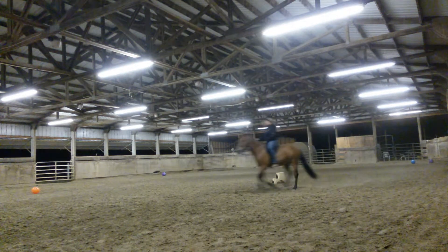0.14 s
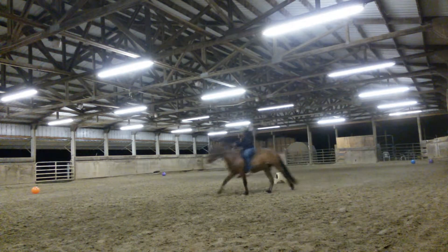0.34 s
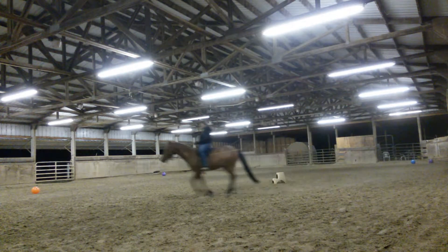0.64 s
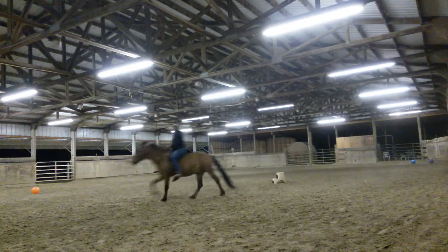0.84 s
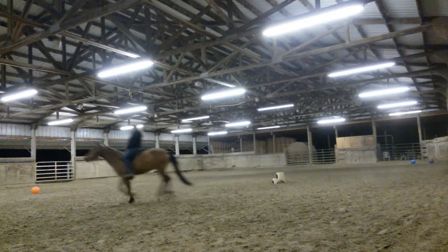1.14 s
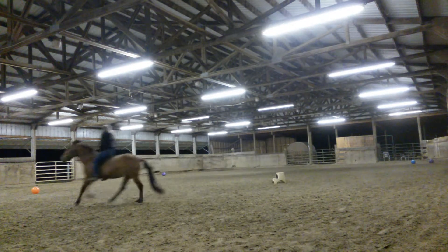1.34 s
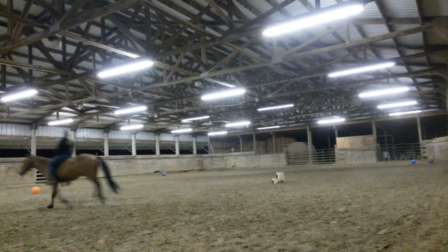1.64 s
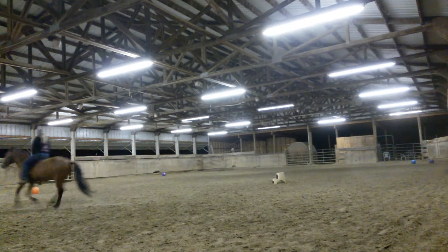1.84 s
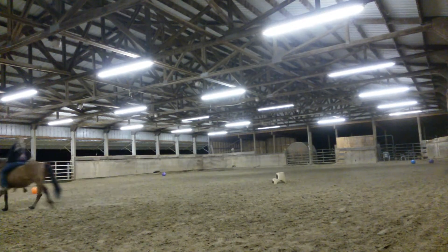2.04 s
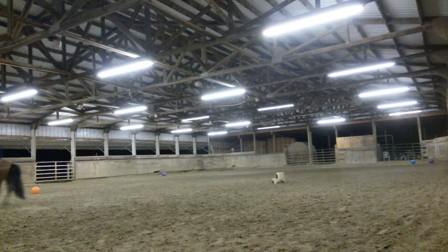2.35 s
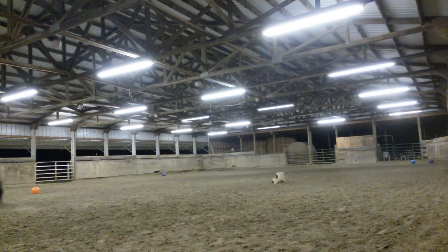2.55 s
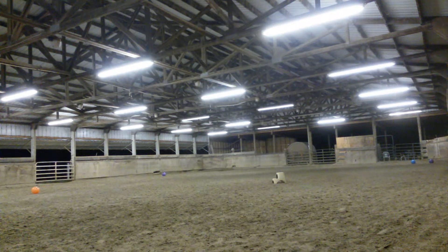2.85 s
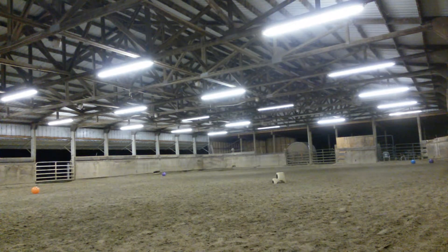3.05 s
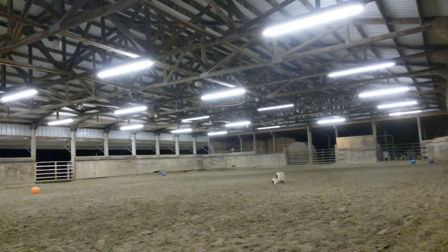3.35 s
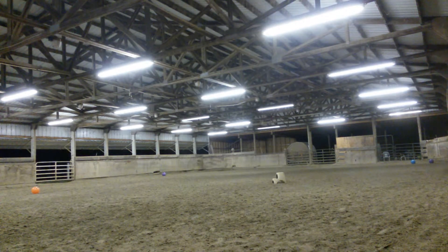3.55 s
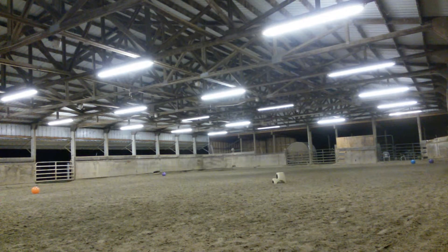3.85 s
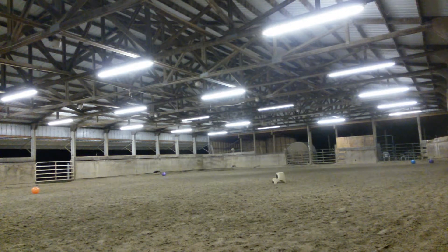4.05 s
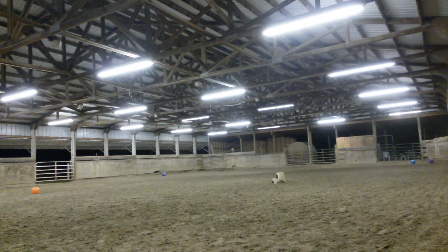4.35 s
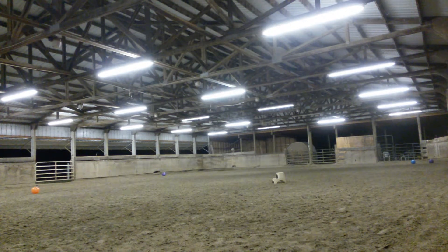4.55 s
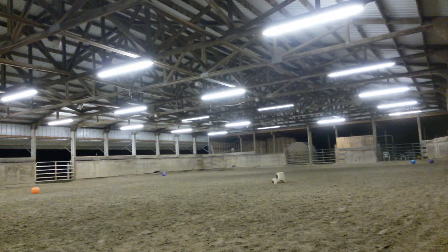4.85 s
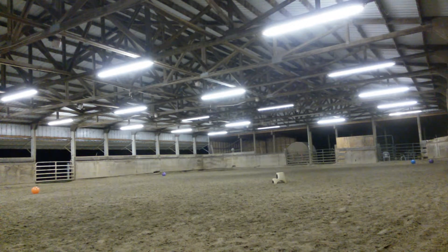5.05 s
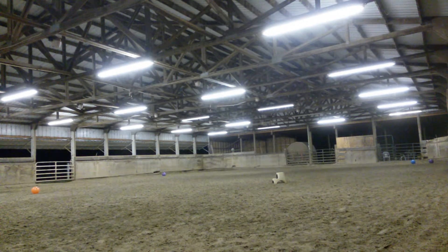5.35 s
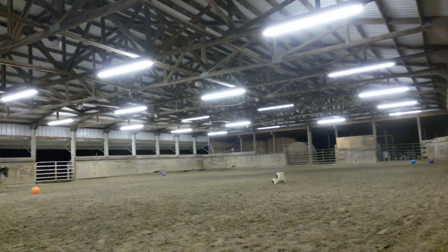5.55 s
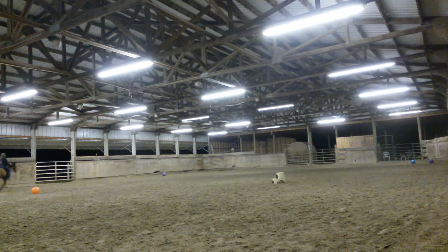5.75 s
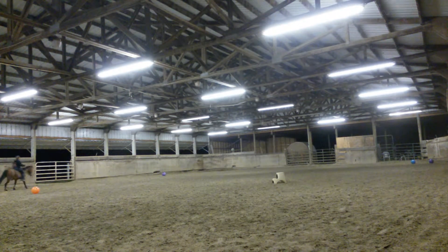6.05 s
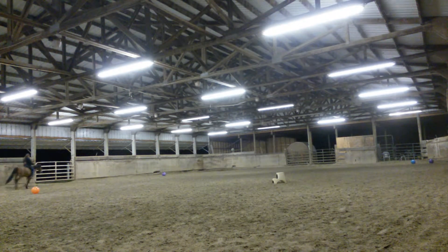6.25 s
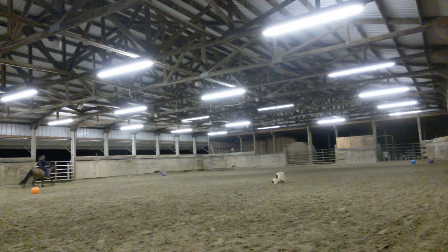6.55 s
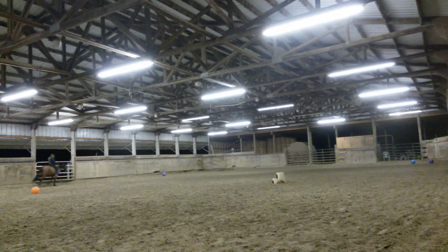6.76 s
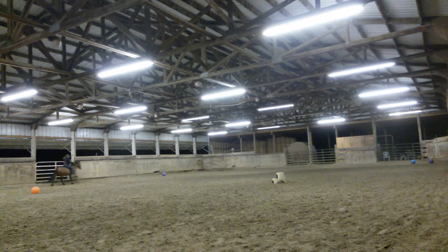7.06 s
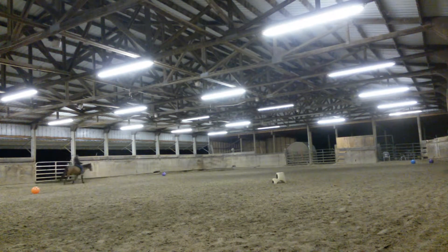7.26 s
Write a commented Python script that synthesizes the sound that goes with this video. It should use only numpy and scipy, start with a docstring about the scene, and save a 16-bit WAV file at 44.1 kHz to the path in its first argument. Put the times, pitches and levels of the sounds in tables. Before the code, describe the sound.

A ridden horse canters on soft dirt in an indoor arena. Dull low thuds come in stride groups, with gritty crunches and sprays of sand, while small metal tack jingles thin and high. It passes nearest around one second, moves left and grows fainter as it circles away. The stereo microphone stays still; a diffuse hall echo and quiet low rumble surround everything.

```python
"""An indoor arena with soft dirt: a horse canters past in front of the microphone and circles away to the left.
Each hoof is a short swinging thud with noise of breaking clods; shaped noise bursts are the thrown sand.
Small metal on the tack jingles with every stride: random touches set off a high, whine-like ring that never
quite stops. A thin swish marks some strides. Decaying noise is the echo, over the quiet rumble of the hall."""
import sys
import numpy as np
from scipy import signal
from scipy.fft import rfft, irfft
from scipy.io import wavfile
from scipy.ndimage import uniform_filter1d, map_coordinates

SR = 44100
rng = np.random.default_rng(int(sys.argv[2]) if len(sys.argv) > 2 else 0)


def persist_wave(psi):
    """Save psi, clipped to +-1, as 16-bit WAV."""
    counts = np.round(np.clip(psi, -1, 1) * 32767).astype(np.int16)
    wavfile.write(sys.argv[1], SR, np.atleast_2d(counts).T)


N = 326011
TIME = np.arange(N) / SR  # [s]

# hoofbeats: (time [s], relative thud level [dB], pitch of the blow [Hz], contact length [s],
# relative thrown sand level [dB])
HOOF_BEATS = [(.0, -36.5, 216, 0.037, -56), (.025, -40.5, 98.8, 0.11, -66.5),
              (.135, -49.5, 172.6, 0.083, -82), (0.373, -38, 101, 0.024, -54.5),
              (0.498, -34, 120.8, 0.018, -56), (0.918, -32.5, 97.4, 0.051, -54),
              (1.029, -46, 126.5, 0.068, -52), (1.498, -35.5, 189, 0.038, -48.5),
              (1.635, -44, 190, 0.036, -67.5), (2.065, -38, 107, 0.027, -52),
              (2.206, -35.5, 195, 0.023, -62.5), (2.523, -37, 200, 0.017, -57),
              (2.628, -41.5, 192.6, 0.029, -56.5), (3.215, -44.5, 187.5, 0.053, -54.5),
              (3.344, -46, 140, .058, -58), (3.786, -53.5, 235, 0.071, -58),
              (4.375, -44.5, 216.6, 0.035, -58.5), (4.51, -49, 100, 0.053, -59),
              (4.927, -42, 101.8, 0.043, -61.5), (5.076, -38, 97.1, 0.062, -65),
              (5.213, -49.5, 98, 0.029, -77), (5.368, -44, 167, 0.035, -65),
              (5.515, -48.5, 121, 0.037, -64), (5.649, -40.5, 100, 0.053, -61.5),
              (5.945, -41.5, 120, .024, -72), (6.077, -42, 174.7, 0.059, -60.5),
              (6.231, -44, 187.5, 0.044, -64), (6.536, -46, 94, 0.017, -78), (6.641, -36, 206, 0.05, -62),
              (6.783, -42, 123.5, 0.035, -63), (7.073, -46, 237, 0.057, -70),
              (7.22, -47, 142.6, 0.045, -62.5)]
# the tack is tossed once a stride: (time [s], length [s], relative jingle level [dB])
TACK_TOSSES = [(-.03, 0.07, -38), (0.357, .33, -45), (0.945, .41, -44), (1.53, 0.32, -47),
               (2.097, 0.26, -49.5), (2.695, 0.25, -51.5), (3.297, 0.17, -50.5), (3.82, 0.26, -55.5),
               (4.383, 0.48, -53), (4.992, 0.34, -51), (5.496, 0.25, -50.5), (6.089, 0.19, -50),
               (6.7, 0.23, -57.5), (7.108, 0.39, -65.5)]


def hoofs(tone_db=-1.0, overtone_db=-6, ground_db=-6, ground_hz=92, thump_db=-10, crumble_s=0.0084):
    """Each hoof sinks in: the soil swings for a few cycles while clods collapse under it."""
    # spectrum of the collapsing clods: (frequency [Hz], relative level [dB])
    thump_spectrum = [(30, -23), (70, -21), (190, 5), (370, 0), (480, -12.5), (650, -6.5), (1000, -24),
                      (2500, -27.5)]
    swing, press = np.zeros(N), np.zeros(N)
    slip = 0.5 * wander(150)  # phase wander [rad]
    for start, db, hz, length, _ in HOOF_BEATS:
        t = TIME[:int(length * SR)]
        load = undb(db) * np.sin(np.pi * t / length)
        # soil gives way unevenly
        uneven = np.take(slip, int(start * SR) + np.arange(len(t)), mode="wrap")
        phase = 2 * np.pi * hz * t + uneven
        depth = min(ground_hz / hz, 1) ** 2  # near 1 for a deep blow, small for a sharp one
        overtone = undb(overtone_db) * depth * np.sin(2 * phase)
        # a sharp blow still shakes the base layer
        ground = undb(ground_db) * (1 - depth) * np.sin(2 * np.pi * ground_hz * t)
        add(swing, start, load * (np.sin(phase) + overtone + ground))
        add(press, start, load)
    # clods go on breaking after the blow
    keep = np.exp(-1 / (crumble_s * SR))
    lingering = signal.lfilter([1 - keep], [1, -keep], press)
    crumble = (press + lingering) / 2
    clods = crumble * colour(rng.standard_normal(N), thump_spectrum)
    return undb(tone_db) * swing + undb(thump_db) * clods


def sand(crunch_db=1, spray_db=0, trickle_db=-7, grit_db=0, grit_s=0.0027, rise_s=0.001, clump_db=2,
         throw_s=0.056, throw_spray_db=3, fall_db=-9, fall_s=0.23,
         near_m=4.65, loose_db=-57, loose_db_per_m=2.38, spray_db_per_m=1.5):
    """Dirt crunches under the hoof, fine grains fly and fall back; loose soil trickles on between steps."""
    # a hoof drags through the sand as it lifts:
    # (time [s], relative crunch level [dB], relative fine spray level [dB], length [s])
    hoof_drags = [(0.25, -52, -50.5, 0.034), (0.781, -50, -48, 0.043), (1.16, -55.5, -80, 0.11),
                  (1.37, -55, -50, 0.082), (1.937, -53.5, -52, 0.041), (2.416, -66, -40.5, 0.032),
                  (2.484, -59, -49.5, 0.038), (3.014, -59, -52, 0.08), (3.091, -52.5, -58, 0.03),
                  (3.645, -59.5, -61, 0.06), (3.925, -54, -58.5, 0.049), (4.222, -64.5, -63, 0.043),
                  (4.792, -62.5, -67, .06), (4.852, -73, -55, 0.032), (4.965, -60.5, -64, 0.11)]
    # single bits of grit snapping: (time [s], relative level [dB])
    grit_snaps = [(0.154, -40.5), (.456, -38), (0.623, -40), (.667, -40.5), (1.292, -39), (1.403, -36),
                  (2.185, -37), (3.575, -49)]
    # how far away the horse is: (time [s], distance [m])
    horse_distance = [(0, 8.1), (1.15, 4.4), (2.3, 6.25), (4.2, 10.7), (5.2, 8.8), (7.39, 13)]
    # spectra of coarse dirt and fine grains: (frequency [Hz], relative level [dB])
    crunch_spectrum = [(150, -4), (550, 4), (1200, 0.5), (2200, -2), (4000, -2.5), (5300, 5.5),
                       (7500, -8.5), (15000, -38)]
    spray_spectrum = [(1500, -24), (5000, 9), (8000, 1), (10000, 6.5), (13300, 15), (14500, -23)]

    crunch, spray, t = np.zeros(N), np.zeros(N), TIME[:SR // 2]
    beyond = curve(horse_distance) - near_m  # metres past the reference distance
    rise = 1 - np.exp(-t / rise_s)
    flying = np.exp(-(t / throw_s) ** 2)
    falling = undb(fall_db) * np.exp(-t / fall_s)
    throw = rise * np.hypot(flying, falling)
    for start, *_, db in HOOF_BEATS:
        add(crunch, start, undb(db) * throw)
    # of the thrown sand, the fine spray fades faster with distance
    spray += crunch * undb(throw_spray_db - spray_db_per_m * beyond)
    for start, low_db, high_db, length in hoof_drags:
        burst = rise * np.exp(-(t / length) ** 2)
        add(crunch, start, undb(low_db + crunch_db) * burst)
        add(spray, start, undb(high_db + spray_db) * burst)
    for start, db in grit_snaps:
        add(spray, start, undb(db + grit_db) * np.exp(-t / grit_s))

    loose = undb(loose_db - loose_db_per_m * beyond) * airborne(hush_db=-3)
    coarse_noise = scattered(lambda: colour(grains(spread_db=3), crunch_spectrum), wet_db=7.5)
    fine_noise = scattered(lambda: colour(grains(spread_db=2.5), spray_spectrum), wet_db=12.5)
    coarse = np.hypot(crunch, loose) * coarse_noise
    fine = np.hypot(spray, undb(trickle_db) * loose) * fine_noise
    return (coarse + fine) * undb(clump_db * wander(40))  # soil falls in lumps


def tack(jingle_db=-1.5, rise_s=0.00032, flutter_db=1.7, rebound_s=0.003, flight_s=0.015, flight_db=-7,
         clink_db=1, rattle_db=-10, rattle_s=0.029):
    """Small metal parts chatter against each other in flurries, ringing briefly at every touch."""
    # modes of the metal: (frequency [Hz], time to fall 60 dB [s], relative level [dB])
    metal_modes = [(6250, 0.023, -18), (6462, 0.016, 21), (6360, 0.035, -19), (5460, 0.0033, -30),
                   (9500, .03, -38)]
    # sharp clinks: (time [s], relative level [dB])
    hard_strikes = [(.029, -27), (.089, -25.5), (.215, -28), (.57, -39), (.68, -31.5), (.954, -32.5),
                    (1.127, -27), (1.341, -33), (1.718, -38), (2.158, -30.5), (2.2, -30), (2.286, -29.5),
                    (2.474, -35), (3.47, -36), (4.097, -35.5), (4.406, -39.5), (4.596, -35), (4.644, -37.5),
                    (5.067, -32), (5.572, -31.5), (5.735, -36.5), (5.89, -42.5)]
    t = TIME[:SR // 10]
    modes = sum(undb(db - 60 * t / t60) * np.sin(2 * np.pi * hz * t) for hz, t60, db in metal_modes)
    ring = (1 - np.exp(-t / rise_s)) * modes
    ring = ring / np.abs(ring).max()

    shake = flurries() * undb(jingle_db + flutter_db * wander(79))
    clinks, rattle = np.zeros(N), np.zeros(N)
    for (start, db), chance in zip(hard_strikes, rng.random(len(hard_strikes))):
        # the parts swing almost free before a hard strike
        shake[(TIME > start - flight_s) & (TIME < start)] *= undb(flight_db)
        strike = undb([db + clink_db])
        add(clinks, start, strike)
        # they bounce once after it and set their neighbours rattling
        add(clinks, start + rebound_s * (0.5 + chance), strike / 2)
        add(rattle, start, undb(db + rattle_db) * np.exp(-t / rattle_s))
    chatter = scattered(touches, wet_db=3.0) * np.hypot(shake, rattle)
    chatter = chatter / np.sqrt(np.sum(ring ** 2))  # makes up for the energy of the ring
    return signal.fftconvolve(chatter + place(clinks), ring[None], axes=1)[:, :N]


def flurries(toss_s=0.02, settle_s=0.094, idle_db=-59):
    """How hard the tack is shaken: each stride tosses it, keeps it going and lets it settle, never to silence."""
    tossed = np.zeros(N)
    for start, length, db in TACK_TOSSES:
        build = np.clip((TIME - start) / toss_s, 0, 1)
        settle = np.exp(-np.maximum(TIME - start - length, 0) / settle_s)
        tossed += undb(db) * build * settle
    return np.hypot(tossed, undb(idle_db) * airborne(hush_db=-4))


def touches(per_s=200):
    """Random metal contacts of unequal strength, at rms 1."""
    return unit((rng.random(N) < per_s / SR) * rng.uniform(0.73, 1, N))


def swishes(hz=4720, width_hz=340, length_s=0.075):
    """A narrow band of hiss, a thin whistling swish, swells and fades on some strides."""
    # (middle [s], level [dB])
    swish_swells = [(.49, -54), (1.8, -57.5), (2.458, -55), (3.22, -63), (3.82, -60.5), (4.54, -60),
                    (6.77, -61.5)]
    swell = sum(undb(db) * np.exp(-((TIME - at) / length_s) ** 2) for at, db in swish_swells)
    b, a = signal.iirpeak(hz, hz / width_hz, fs=SR)
    return swell * unit(signal.filtfilt(b, a, diffuse()))


def airborne(hush_db, lead_s=0.069, width_s=0.043):
    """Gain that dips just before each toss of the tack: all four hooves are off the ground, little stirs."""
    dips = sum(np.exp(-((TIME - start + lead_s) / width_s) ** 2) for start, *_ in TACK_TOSSES)
    return undb(hush_db * dips)


def place(x):
    """Bearing of the horse from the microphone: the sound reaches the nearer ear first."""
    # (time [s], lead of the left ear [ms])
    horse_bearing = [(0, -0.12), (.75, -0.022), (1.25, 0.1), (2.3, 0.2), (5.5, 0.2215), (7.39, 0.096)]
    lead = curve(horse_bearing) * SR / 1000  # [samples]
    return np.array([map_coordinates(x, [np.arange(N) + side * lead / 2], order=5) for side in (1, -1)])


def scattered(source, wet_db):
    """Tiny impacts arrive directly, and off ground and boards in a different jumble at each ear."""
    wet = undb(wet_db)
    direct = place(source())
    jumble = np.array([source(), source()])
    return (direct + wet * jumble) / np.hypot(1, wet)


def arena(x, t60_s, gap_s):
    """Roof and walls answer with a diffuse tail that swells in over a short gap and dies away."""
    t = TIME[:SR]
    decay = np.exp(-np.log(1000) * t / t60_s)
    onset = 1 - np.exp(-(t / gap_s) ** 2)
    tail = diffuse()[:, :SR] * decay * onset
    tail = tail / np.sqrt(np.sum(tail ** 2) / 2)
    return signal.fftconvolve(x[None], tail, axes=1)[:, :N]


def background(hall_db, rumble_db):
    """The steady air of the hall, and a low rumble that follows the strides and fades as the horse leaves."""
    # spectra of the air and the rumble: (frequency [Hz], relative level [dB])
    hall_spectrum = [(25, -18), (100, 5.5), (240, -17.5), (490, -13.5), (1700, -21), (4500, -21),
                     (6500, -25), (8000, -25), (13000, -24)]
    rumble_spectrum = [(25, -31), (50, 3.5), (100, -1), (230, -2.5), (450, -13.5), (900, -21.5),
                       (2000, -26)]
    # low rumble in the hall: (time [s], relative level [dB])
    rumble_course = [(0, -44.5), (.74, -48.5), (1.05, -48.5), (2.3, -53), (4.2, -55.5), (7.39, -54)]
    rumble_gain = undb(curve(rumble_course) + rumble_db) * airborne(hush_db=-4)
    air = undb(hall_db) * colour(diffuse(), hall_spectrum)
    return air + rumble_gain * colour(diffuse(), rumble_spectrum)


def diffuse(alike_hz=600):
    """Noise from all around: mostly alike at both ears in the bass, unrelated in the treble."""
    hz = np.fft.rfftfreq(N, 1 / SR)
    mid, side = rfft(rng.standard_normal((2, N)))
    apart = np.pi / 4 * np.minimum(0.23 + 0.73 * hz / alike_hz, 1)
    return irfft(mid * np.cos(apart) + np.array([[1], [-1]]) * side * np.sin(apart), N)


def grains(spread_db):
    """Dense tiny impacts of very unequal size, at rms 1."""
    size_db = spread_db * np.minimum(rng.exponential(size=N), 2 * np.pi)
    return unit(rng.standard_normal(N) * undb(size_db))


def wander(rate_hz):
    """A smooth random motion of rms 1: noise averaged twice over 1 / rate_hz."""
    size = int(SR / rate_hz)
    return unit(uniform_filter1d(uniform_filter1d(rng.standard_normal(N), size), size))


def colour(x, points):
    """Give a sound a spectrum, at rms 1."""
    return unit(irfft(rfft(x) * spectrum(points), N))


def spectrum(points):
    """Gain at every frequency from (frequency [Hz], level [dB]) points."""
    hz, db = np.transpose(points)
    return undb(np.interp(np.log(np.fft.rfftfreq(N, 1 / SR) + 1), np.log(hz), db))


def curve(rows):
    """The second column of a table, joined by straight lines in time."""
    rows = np.array(rows)
    return np.interp(TIME, rows[:, 0], rows[:, 1])


def add(track, start, sound):
    """Mix a sound into a track at a time in seconds."""
    i = max(int(start * SR), 0)
    track[i:i + len(sound)] += sound[:N - i]


def undb(db):
    """Decibels to gain."""
    return 10 ** (np.asarray(db) / 20)


def unit(x):
    """Scale to rms 1."""
    return x / np.sqrt(np.mean(x ** 2))


def scene():
    """Horse and tack, heard directly and through the hall."""
    thuds, dirt, jingle = hoofs(), sand() + swishes(), tack()
    echo = undb(-4) * arena(thuds, t60_s=0.92, gap_s=0.017)
    echo = echo + undb(-3.5) * arena(dirt.mean(axis=0), t60_s=0.42, gap_s=0.0014)
    echo = echo + undb(-2) * arena(jingle.mean(axis=0), t60_s=0.43, gap_s=0.0028)
    return place(thuds) + dirt + jingle + echo + background(hall_db=-60.0, rumble_db=-4.5)


def record(dry, top_hz=14450):
    """The two microphone ports colour the sound differently, most in the treble; the top is cut steeply."""
    # microphone colour: (frequency [Hz], left minus right [dB])
    port_colour = [(30, 12), (90, -3.5), (250, -0.5), (800, 0), (3000, 1), (4200, 3.5), (4900, 16),
                   (5700, 6), (6500, 5.5), (7600, -7.5), (9200, 0), (12400, -13), (14500, 3.5)]
    ratio = spectrum(port_colour)
    # the two gains keep the same total power
    ports = np.array([ratio, np.ones_like(ratio)]) * np.sqrt(2 / (1 + ratio ** 2))
    coloured = irfft(rfft(dry) * ports, N)
    return signal.sosfilt(signal.ellip(10, 0.2, 80, top_hz, fs=SR, output="sos"), coloured)


dry = scene()
out = record(dry)
persist_wave(out)
```